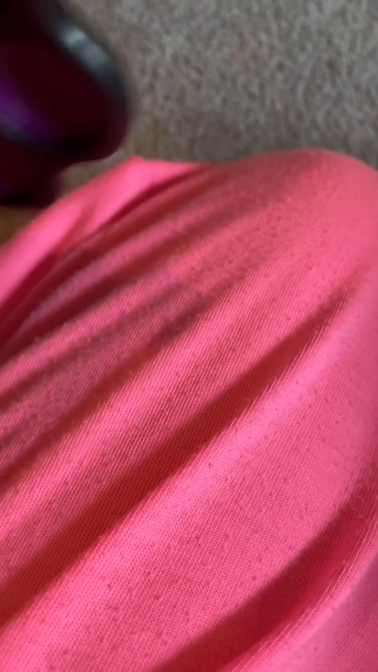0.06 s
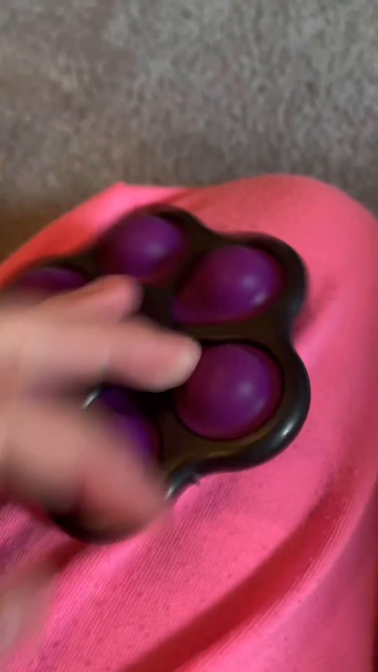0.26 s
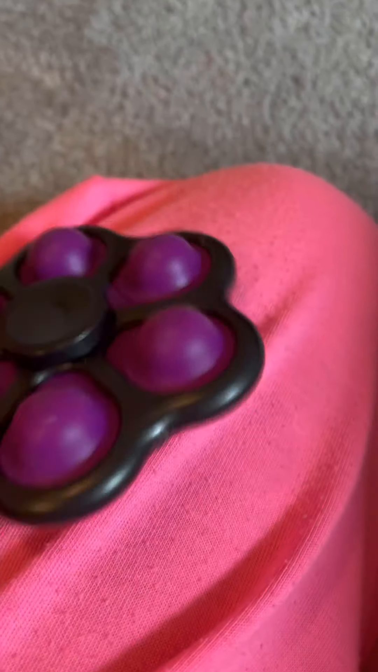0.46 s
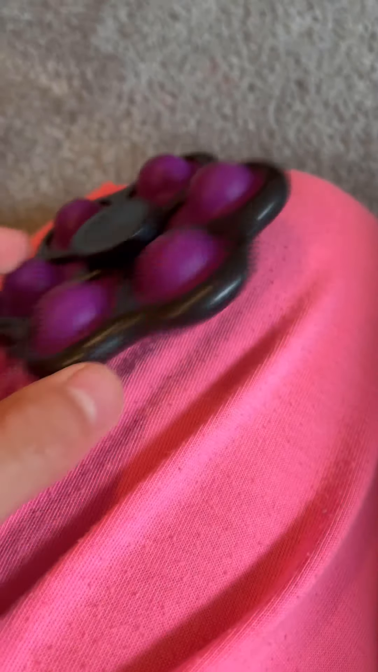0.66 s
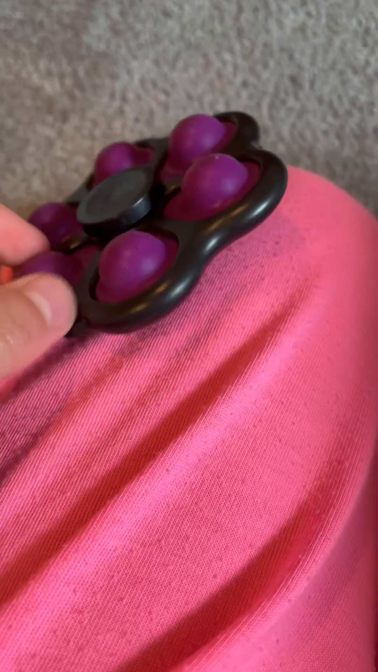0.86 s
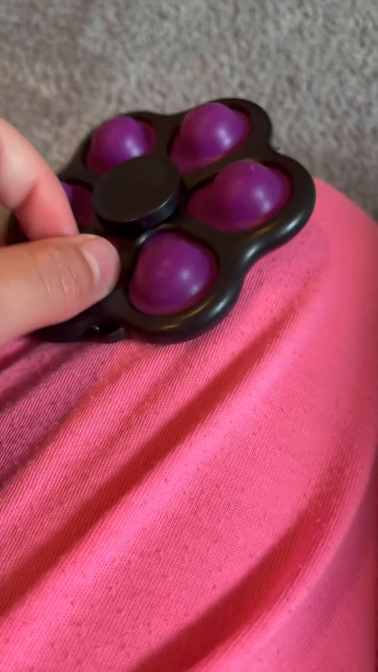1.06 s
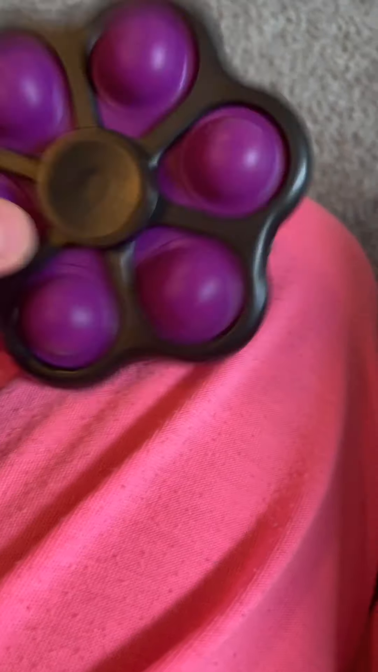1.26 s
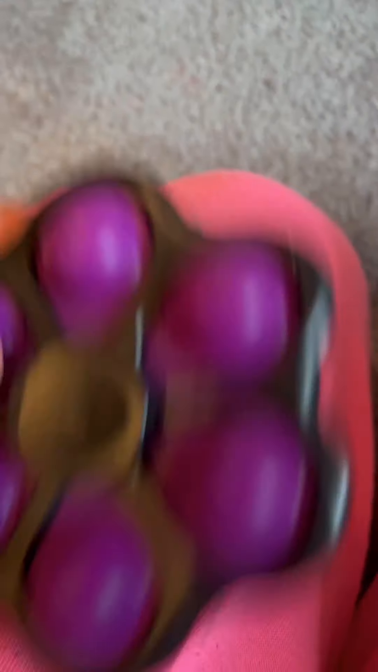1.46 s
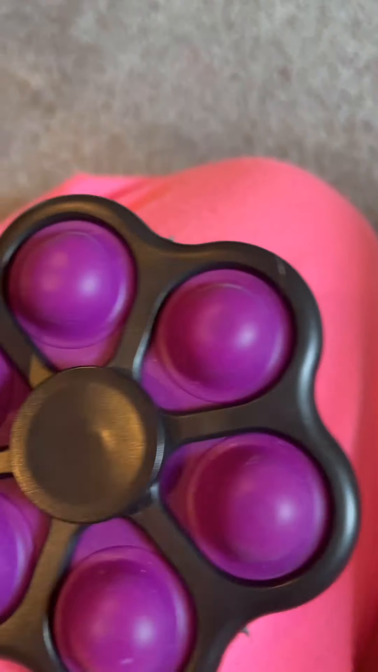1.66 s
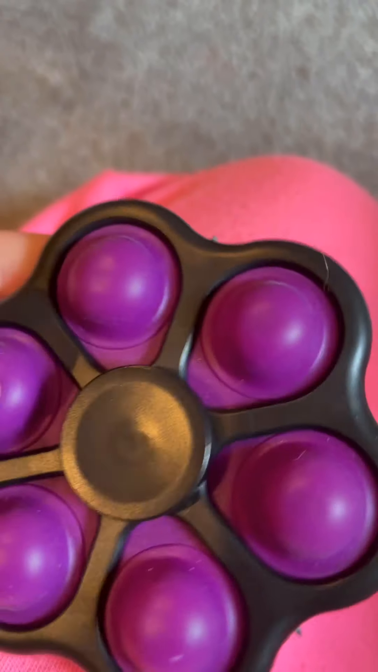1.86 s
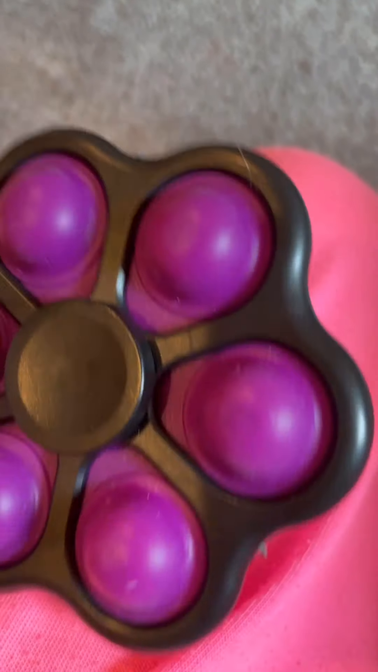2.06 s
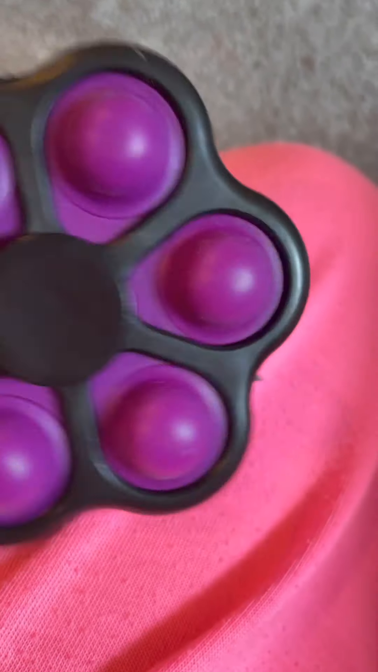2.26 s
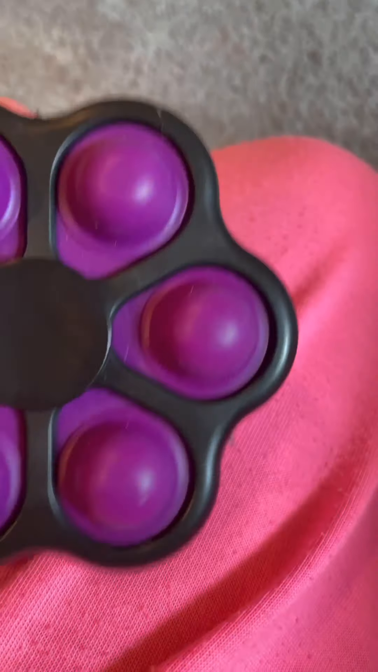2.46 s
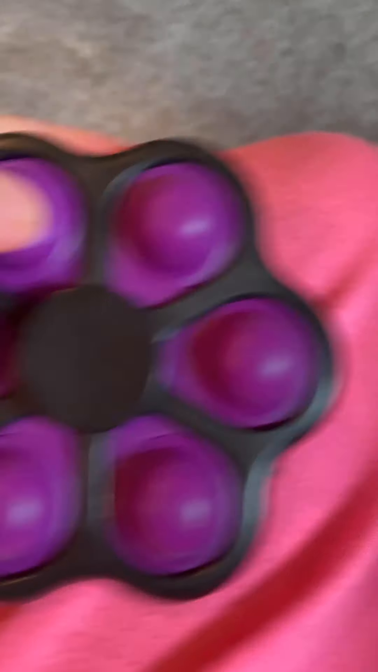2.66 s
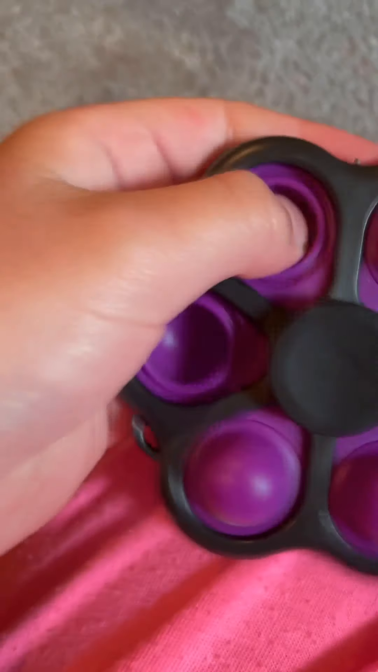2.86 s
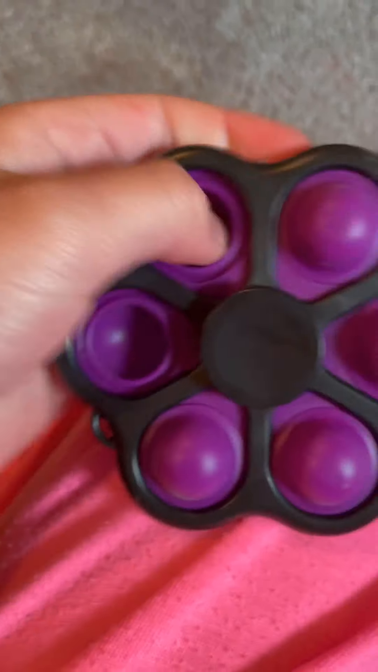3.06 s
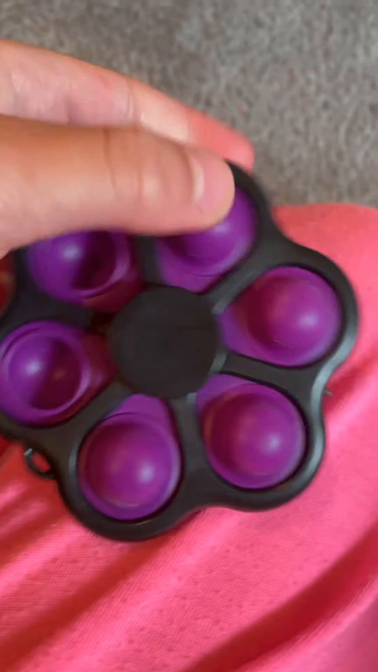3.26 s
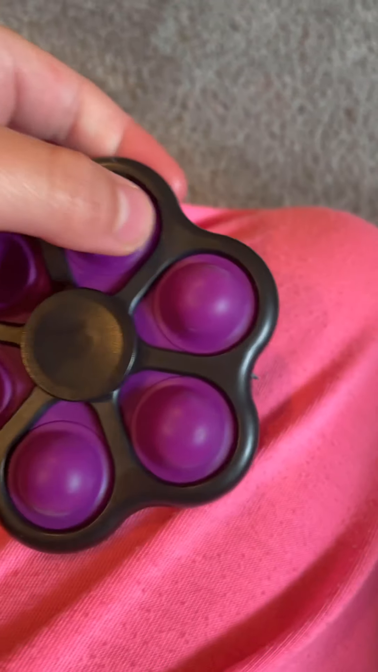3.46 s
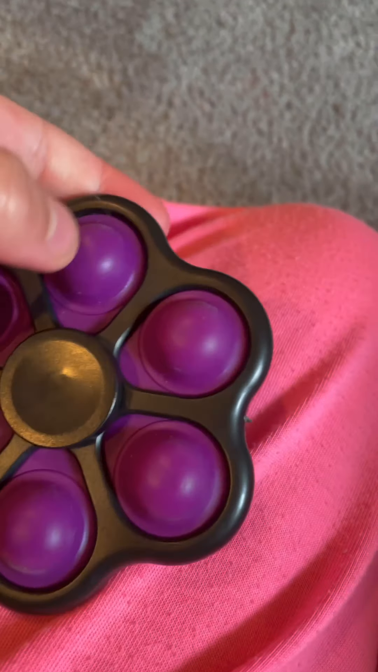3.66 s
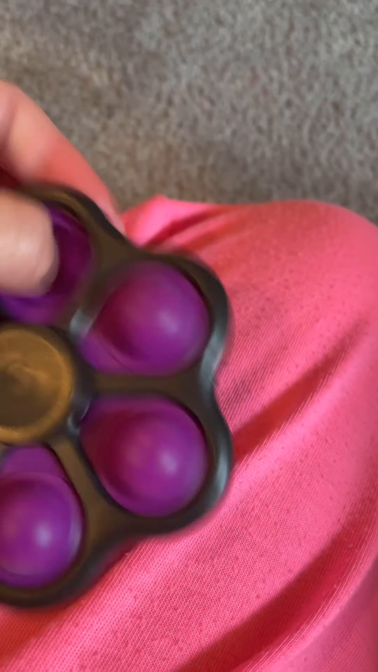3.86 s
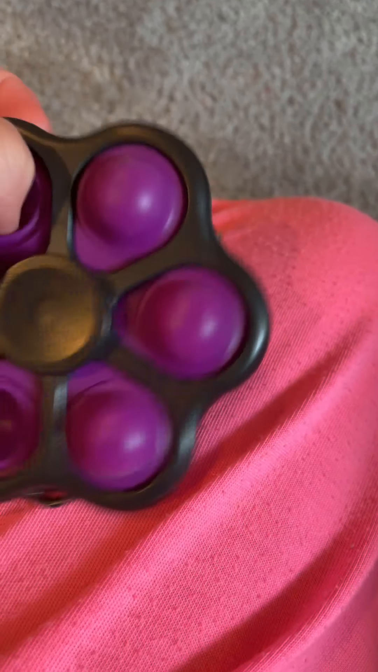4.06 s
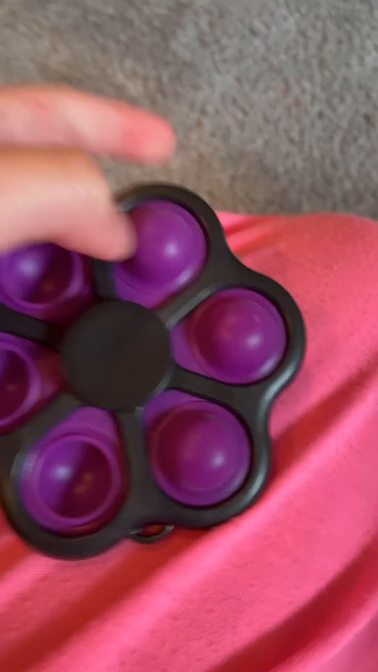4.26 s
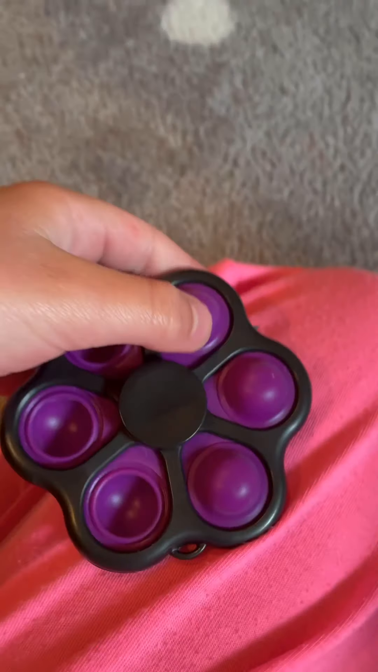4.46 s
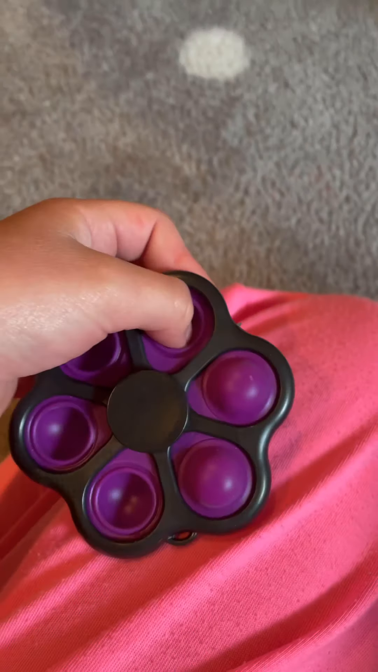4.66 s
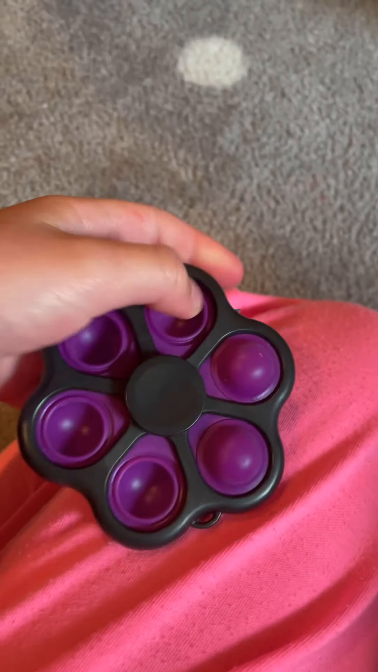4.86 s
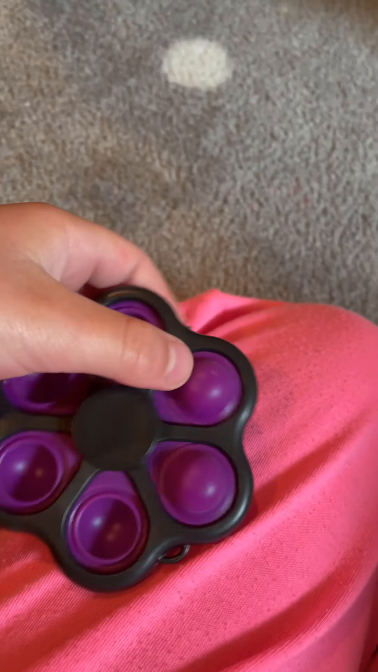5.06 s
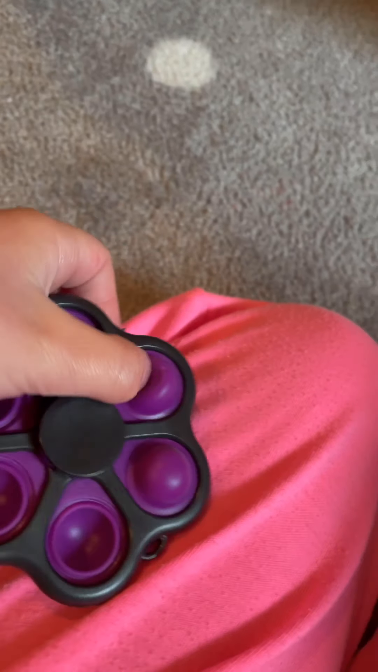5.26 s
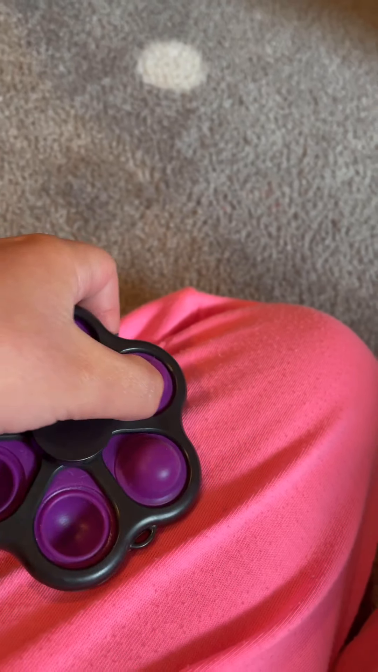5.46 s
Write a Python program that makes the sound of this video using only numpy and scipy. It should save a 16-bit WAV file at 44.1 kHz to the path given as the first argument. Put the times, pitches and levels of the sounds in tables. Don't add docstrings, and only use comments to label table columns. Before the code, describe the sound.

Close up in a quiet carpeted room, fingers tick, knock and rustle on a plastic-framed silicone bubble toy resting on a clothed lap. After two seconds a dome pops loudly, followed by three more pops about a second apart, the last faintest. Small clicks fill the gaps and a tiny creak comes before the third. Light touches end it over low, faint rumble, captured by a nearby stereo phone.

```python
import sys
import numpy as np
from scipy import signal
from scipy.fft import rfft, irfft, next_fast_len
from scipy.io import wavfile
from scipy.ndimage import map_coordinates

SR = 44100
rng = np.random.default_rng(int(sys.argv[2]) if len(sys.argv) > 2 else 0)


def boost_factor(decibels):
    exponent = np.asarray(decibels, float) / 20
    return 10 ** exponent


def wav_record(signal):
    frames = np.transpose(np.atleast_2d(signal))
    bounded = np.clip(frames, -1, 1)
    quanta = np.round(bounded * 32767).astype(np.int16)
    wavfile.write(sys.argv[1], SR, quanta)


N = 242991
SPAN = np.arange(-441, 1764) / SR


def unit(x):
    return x / np.sqrt(np.mean(x ** 2) + 1e-20)


def along(points, hz):
    f, v = np.transpose(points)
    return np.interp(np.log(hz + 1), np.log(f + 1), v)


def curves(rows):
    s, *cols = np.transpose(rows)
    return [np.interp(np.arange(N) / SR, s, c) for c in cols]


def wobble(rate):
    knots = rng.standard_normal(int(N * rate / SR) + 4)
    return map_coordinates(knots, [np.arange(N) * rate / SR])


def filtered(x, response):
    m = next_fast_len(x.shape[-1] + 4096)
    return irfft(rfft(x, m) * response(np.fft.rfftfreq(m, 1 / SR)), m)[..., :x.shape[-1]]


def coloured(x, spectrum):
    closed = [(spectrum[0][0] / 2, -120), *spectrum, (spectrum[-1][0] * 2, -120)]
    return unit(filtered(x, lambda hz: boost_factor(along(closed, hz))))


# (frequency [Hz], coherence [0 to 1])
PORT_COHERENCE = [(60, .9985), (140, 0.99), (300, 0.8), (600, 0.25), (1000, .55), (1500, .72), (2000, 0.89),
                  (3000, .9), (9000, .9), (15000, .75)]


def spread(pair):
    def turn(hz):
        return np.arccos(np.clip(along(PORT_COHERENCE, hz), -1, 1)) / 2
    same, apart = filtered(pair, lambda hz: np.array([np.cos(turn(hz)), np.sin(turn(hz))]))
    return np.array([same + apart, same - apart])


def hump(rise, fall, late=0, edge=0.66, hold=0):
    t = SPAN - late
    fade = np.exp(-(np.maximum(t - hold, 0) / fall) ** edge)
    return np.where(t < 0, np.exp(-(t / rise) ** 2), fade)


def add(track, s, piece):
    track[round(s * SR):][:len(piece)] += piece


def shifted(track):
    return track[-round(SPAN[0] * SR):][:N]


# (frequency [Hz], density [dB per Hz])
CRACK_SPECTRUM = [(700, -27.5), (1200, -16.5), (3000, -2), (4500, -0.5), (7000, -1.5), (9000, -5.5),
                  (12000, -13.5), (15500, -14.5), (16300, -23.5)]
# (time [s], peak [dB], crack [dB], swell [ms], fade [ms])
SNAPS = [
    (1.989, -6, -22, 1.23, 0.5),
    (2.8672, -10.5, -13, 0.92, 0.84),
    (3.8734, -8.5, -13.5, 0.6, 1.5),
    (4.633, -20.5, -10.5, 0.71, 0.76),
]
# (frequency [Hz], width [Hz], level [dB])
DOME_1_MODES = [(393, 290, -4.5), (880, 150, -26.5), (1480, 390, -20.5), (1800, 300, -19), (2490, 190, 4),
                (3620, 1300, -22.5), (6430, 1300, -29)]
DOME_2_MODES = [(456, 240, -1.5), (673, 200, -4.5), (899, 160, -9), (1477, 320, -6.5), (2000, 400, -8.5),
                (2310, 500, -8), (2690, 500, -7), (5200, 200, -23)]
DOME_3_MODES = [(470, 270, -5.5), (870, 170, -16.5), (1560, 80, -16.5), (1950, 350, -9.5), (2330, 620, -6),
                (3300, 330, -22), (3908, 270, -24), (5300, 840, -16.5)]
DOME_4_MODES = [(490, 210, -1.5), (845, 260, -4), (1403, 277.5, -9), (1780, 530, -6.5), (2310, 980, -6.5),
                (3000, 500, -13), (3650, 180, -15.5), (4470, 290, -41)]
AWAY_DB = (-5.5, 2, 5, 6.5)
AWAY_LOW_DB = (-1.5, 4, 0, 5)
HOLD_MS = (0.028, 0.18, 0.1, 2.6)


def dome_mode(hz, width, level_db, swell_ms, fade_ms, hold_ms, ring_db):
    late = 0.0029 / (1 + (hz / 900) ** 4)
    slow = hz < 1000
    if slow:
        push = hump(0.34 / width, 0.32 / width, late - 0.18 / hz, edge=1.5)
        envelope = push + boost_factor(ring_db) * hump(0.0015, 0.0028, late + 0.00052)
    else:
        envelope = hump(swell_ms / 1000, fade_ms * 0.39 / width, late, edge=0.99, hold=hold_ms * 1.6 / hz)
    wave = np.cos(2 * np.pi * (hz * (SPAN - late) + 0.5 * slow))
    return boost_factor(level_db) * width / 400 * wave * envelope


def off_axis_pop(dome, low_db, crack_db):
    def response(f):
        power = boost_factor(crack_db - 6.0 + along(CRACK_SPECTRUM, f)) ** 2
        for hz, width, level_db in dome:
            power = power + boost_factor(level_db + low_db * (hz < 600)) ** 2 / (1 + ((f - hz) / (0.7 * width)) ** 2)
        notch_db = -11.5 * np.exp(-((f - 1083.7) / 130) ** 2)
        return boost_factor(notch_db) * np.sqrt(power)
    return filtered(1.0 * (SPAN == 0), response)


def pops():
    near, far, uneven = np.zeros((3, N + SR))
    domes = (DOME_1_MODES, DOME_2_MODES, DOME_3_MODES, DOME_4_MODES)
    ring_on_db = (-23, -11.5, -15.5, -9.5)
    port_hiss_db = (-47, -61.5, -41, -35)
    lean = (-0.04, -0.14, -0.05, -0.075)
    each = zip(SNAPS, domes, AWAY_DB, AWAY_LOW_DB, HOLD_MS, ring_on_db, port_hiss_db, lean)
    for snap_row, dome, away_db, low_db, hold_ms, ring_db, hiss_db, share in each:
        s, db, crack_db, swell_ms, fade_ms = snap_row
        grit = rng.standard_normal((2, len(SPAN)))
        burst = hump(swell_ms / 1200, 0.0029, edge=1.9, hold=hold_ms / 3000)
        snap = boost_factor(crack_db) * coloured(grit[0], CRACK_SPECTRUM) * burst
        for hz, width, level_db in dome:
            snap = snap + dome_mode(hz, width, level_db, swell_ms, fade_ms, hold_ms, ring_db)
        slug = filtered(snap, lambda f: 1 / (1 + (f / 620) ** 8))
        hissing_air = unit(filtered(grit[1], lambda f: np.exp(-((f - 12350) / 1100) ** 2)))
        add(near, s, boost_factor(db) * snap)
        add(far, s, boost_factor(db + 26.0 + away_db) * off_axis_pop(dome, low_db, crack_db))
        add(uneven, s, boost_factor(db) * share * slug)
        add(uneven, s, boost_factor(db + hiss_db) * burst ** 1.7 * hissing_air)
    return shifted(near), shifted(far), shifted(uneven)


# (time [s], peak [dB], ring [Hz], crack [dB])
LIGHT_TAPS = [(0.23, -34, 3640, -6), (0.264, -57, 2480, -8), (0.3494, -52, 2990, -19),
              (0.396, -58.5, 2770, -29), (0.4459, -42, 3070, -11), (0.4768, -60, 3020, 1),
              (0.497, -45, 3320, -4.5), (0.5375, -38, 3000, -9), (0.5524, -38.5, 3000, -20),
              (0.576, -48, 2970, -23), (0.582, -55, 3004, -27), (1.2581, -50, 2780, 12),
              (1.3385, -58.5, 4300, 7), (1.5232, -42, 2750, -7), (1.6119, -50, 3150, -1.5),
              (1.62, -47, 2750, -4.5), (1.911, -52.5, 1377, -27), (2.3938, -45, 3220, -10.5),
              (3.0648, -56.5, 2282, 0), (3.103, -49.5, 2500, -8.5), (3.2606, -62.5, 2680, -13),
              (3.3443, -63.5, 2660, -7), (3.6987, -62.5, 1559, -29), (3.7671, -51, 2590, -11),
              (4.1788, -46, 5600, -0.5), (4.202, -50.5, 2530, -18), (4.5383, -43.5, 2690, -4.5),
              (4.551, -51, 2496, -3), (5.0747, -66, 2870, -25), (5.2822, -57.5, 2867, -2.5),
              (0.032, -46, 3970, -11), (0.1883, -54, 5200, 0), (0.241, -49, 5100, -6),
               (.4345, -57, 3080, -21), (0.47, -57, 2880, 0), (1.122, -54, 2340, -21),
               (1.132, -59, 2320, -3.5), (1.157, -72, 2300, 6), (1.197, -50, 4130, 3.5),
               (1.2564, -45.5, 6200, -11), (1.287, -42, 4400, -27), (1.4564, -58.5, 2590, -10),
               (1.501, -57, 4260, -17), (1.513, -55, 5200, -12), (1.59, -61, 2680, -2),
               (2.1612, -42.5, 5300, -4), (2.318, -66.5, 2680, -15), (2.3811, -60, 2500, -13),
               (2.466, -74.5, 4980, -5), (2.7205, -67.5, 4240, -1.5), (3.0089, -57, 4500, 0.5),
               (3.568, -56, 2750, -7), (4.14, -60.5, 2480, 2.5), (4.1502, -50, 1800, -13),
               (4.1947, -61, 5500, -6), (4.232, -53.5, 1700, -6), (4.817, -65, 8560, -5.5),
               (4.8543, -47.5, 1693, -23), (4.869, -66, 2470, -15)]
# (time [s], peak [dB], crack [dB], thud [Hz], thud [dB])
FINGER_KNOCKS = [(0.0339, -53, -4, 544, 8), (0.193, -67.5, -1, 785, 14.5), (0.2518, -39, 5, 694, -5.5),
                 (0.546, -48.5, -4, 590, -9), (0.607, -71.5, 6, 540, 17.5), (1.1959, -46.5, 3.5, 726, -2),
                 (1.254, -51, 10.5, 678, -0.5), (1.262, -53.5, -28.5, 520, 6.5),
                 (1.2821, -49.5, 11, 516, -15), (1.286, -48, 15.5, 563, -4), (1.316, -50.5, -36, 645, -2),
                 (1.341, -57.5, -8, 620, 8.5), (1.4328, -55.5, 9.5, 636, -7), (2.161, -49, 6.5, 683, -2),
                 (2.1682, -44.5, -3.5, 694, -6.5), (2.5325, -57.5, -6.5, 682, 3),
                 (2.9783, -51.5, 0, 563, 7.5), (3.0014, -59.5, 5, 681, -8), (3.7776, -40, -3, 710, -11.5),
                 (4.15, -47, -4, 625, -4.5), (4.1658, -50, -18, 538, -5.5), (4.2407, -41, -5, 679, -11.5),
                 (4.8551, -51.5, 5, 686, -1.5), (5.2111, -81, -9.5, 729.5, 25.5),
                 (2.683, -92, -13, 749, 24), (4.1795, -77.5, -8, 656, 24), (1.467, -70, 2, 835, 9)]
# (time [s], peak [dB], crack [dB], thud [dB], thud [Hz])
SKIN_GIVES = [(1.959, -41, -5, 18, 480), (1.9711, -54, 3.5, -11.5, 440.7), (1.98, -27, -25.5, -16.5, 439.2),
              (2.7878, -33, -2.5, 4.5, 420), (2.8575, -46.5, -14, -15.5, 437.5),
              (3.8535, -24.5, -7, 4, 442.2), (3.8614, -39, -2.5, -4.5, 441),
              (3.8639, -45.5, -9.5, -8.5, 440), (3.8688, -28.5, -17, -17, 442.6),
              (4.5854, -37, 4, 4.5, 428.7), (4.61, -45.5, 2, -12.5, 441.4), (4.625, -40, -10.5, -15.5, 440)]


def contact(db, ring_hz, crack_db, thud_hz, thud_db, thud_shape):
    late, rise, fall = thud_shape
    grit = rng.standard_normal((2, len(SPAN)))
    rough = unit(filtered(grit[0], lambda hz: 1 / (1 + ((hz - ring_hz) / 600) ** 2)))
    pure = np.sqrt(2) * np.sin(2 * np.pi * ring_hz * SPAN)
    ring = (0.58 * rough + 0.42 * pure) * hump(0.0006, 0.0016, late=0.00055)
    crack = boost_factor(crack_db) * coloured(grit[1], CRACK_SPECTRUM) * hump(0.0005, 0.0012, late=0.0008)
    push = np.cos(2 * np.pi * thud_hz * (SPAN - late)) * hump(rise, fall, late=late, edge=1.2)
    return boost_factor(db - 5.5) * (ring + crack + boost_factor(thud_db + 1.5) * push)


def ticks():
    track = np.zeros(N + SR)
    frame, skin = (0.002, 0.0011, 0.0026), (0.0025, 0.00081, 0.0013)
    frame_hz, skin_hz = 2750, 2560
    for s, db, ring_hz, crack_db in LIGHT_TAPS:
        add(track, s, contact(db, ring_hz, crack_db, 415, -20, frame))
    for s, db, crack_db, thud_hz, thud_db in FINGER_KNOCKS:
        add(track, s, contact(db, frame_hz, crack_db, thud_hz, thud_db, frame))
    for s, db, crack_db, thud_db, thud_hz in SKIN_GIVES:
        add(track, s, contact(db, skin_hz, crack_db, thud_hz, thud_db, skin))
    return shifted(track)


# (time [s], peak [dB], frequency [Hz], ring [ms])
PINGS = [(0.478, -51, 2850, 2), (0.485, -57, 2750, 3), (0.4902, -57, 2750, 2), (.4962, -53, 2880, 2),
         (0.502, -60, 2950, 1.5), (0.5456, -46, 2470, 1.3), (.558, -57, 2680, 2), (.567, -62, 2800, 2),
         (.5755, -59, 2900, 1.5), (.5875, -61, 3000, 1.3), (1.202, -61, 4004, 6), (1.232, -68, 3530, 2),
         (1.289, -49.5, 4200, 6.3), (1.293, -52, 3120, 1.7), (1.302, -81, 4080, 5),
         (1.3435, -66, 3000, 1.5), (1.438, -57, 2600, 1.4), (1.503, -59, 2620, 1.3),
         (1.619, -54, 2680, 1.6), (1.64, -58, 2800, 2), (1.661, -64, 2540, 2.7),
         (2.17, -53.5, 2700, 1.44), (3.001, -60, 4300, 1.5), (3.009, -65, 2390, 2),
         (3.888, -45.5, 2210, 1.5), (3.885, -50, 5970, 1.97), (4.037, -63.5, 2300, 3),
         (2.882, -45.5, 2300, 1.7), (2.803, -58, 2200, 2), (2.003, -44.5, 2551, 2),
         (4.647, -45, 2000, 2.4), (4.5385, -56.5, 3503, 1.3), (5.245, -72, 2290, 1.5),
         (5.246, -68, 3300, 1.34), (5.252, -64.5, 1870, 1.7), (5.286, -68, 1880, 1.8),
         (3.779, -52, 1550, 1.8), (4.242, -55, 1800, 1.44), (2.112, -62, 2550, 4),
         (2.125, -62, 2500, 3), (.231, -46, 5600, 1.5)]
# (time [s], peak [dB], frequency [Hz], ring [ms])
KNUCKLE_BUMPS = [(1.439, -61.5, 620, 2), (1.516, -60, 670, 1.9), (1.526, -56, 580, 2.2),
                 (1.614, -63, 610, 1.5), (2.177, -54.5, 660, 2), (2.19, -64, 740, 3.4),
                 (2.396, -63.5, 682, 2.4), (3.01, -56.5, 673, 2.5), (3.107, -63, 680, 2)]


def rattle():
    track = np.zeros(N + SR)
    for s, db, hz, ring_ms in PINGS + KNUCKLE_BUMPS:
        envelope = hump(0.74 / hz, ring_ms / 1000, edge=2.3)
        add(track, s, boost_factor(db) * np.sin(2 * np.pi * hz * SPAN) * envelope)
    return shifted(track)


# (frequency [Hz], density [dB per Hz])
STROKE_FIZZ_SPECTRUM = [(700, -7.5), (1200, -17), (3500, 4), (5000, 2.5), (8000, 1.5), (10000, -3.5),
                        (13000, -4.5), (16000, -3.5)]
# (time [s], half length [s], body [dB], body [Hz], fizz [dB])
SKIN_STROKES = [(0.201, 0.021, -70.5, 4900, 6), (0.25, 0.011, -66, 2900, -8), (0.3, 0.015, -63, 2790, -8),
                (0.488, 0.023, -67, 2880, -6.5), (0.56, 0.028, -75.5, 2750, -1),
                (0.237, 0.12, -89.5, 2600, 15.5), (0.66, 0.11, -100.5, 2800, 18),
                (1.392, 0.031, -79, 8700, -12), (2.68, 0.063, -97.5, 2400, 10.5),
                (4.394, 0.029, -89, 7260, -11), (0.977, .053, -97.5, 2780, 18),
                (1.118, 0.029, -71.5, 2370, -8), (1.275, 0.012, -71.5, 2600, -28),
                (1.29, .0092, -85, 4000, -20), (1.461, 0.018, -69, 2670, -3.5), (1.46, 0.021, -78, 2800, 2),
                (1.63, 0.042, -71, 2700, -7.5), (1.87, 0.011, -76.5, 2500, -5),
                (2.168, 0.052, -77, 2565, 1.5), (2.31, 0.018, -87, 3600, 2.5),
                (2.44, .013, -67.5, 2430, -4), (2.453, 0.016, -62.5, 8050, -7.5),
                (3.03, 0.016, -68.5, 2520, -3.5), (3.279, 0.034, -79.5, 8100, -9),
                (3.59, 0.019, -67.5, 2750, -3), (4.178, 0.034, -76, 2366, -18),
                (4.606, 0.021, -62.5, 2200, -23), (4.836, 0.012, -73.5, 2025, -5),
                (4.934, 0.031, -71, 2650, -4), (5.248, 0.0094, -75, 2430, -8.5),
                (3.29, 0.046, -88, 2780, -17), (.168, 0.026, -86, 3700, 3),
                (4.102, 0.012, -73.5, 2330, -6.5), (3.59, 0.031, -78.5, 1560, -12),
                (3.585, .022, -76, 5400, -10), (1.79, 0.037, -86.5, 1300, -23),
                (3.11, .03, -83.5, 1400, -15), (3.795, 0.013, -82.5, 2600, -10),
                (2.14, .03, -82.5, 1400, -14)]


def strokes():
    track = np.zeros(N + SR)
    catches = boost_factor(4.5 * wobble(220))
    t = np.arange(-SR // 6, SR // 6) / SR
    for s, half, db, body_hz, fizz_db in SKIN_STROKES:
        grip = catches[round(s * SR) - len(t) // 2:][:len(t)]
        grit = rng.standard_normal((2, len(t))) * grip ** [[1], [0.4]]
        width = 300 + 0.049 * body_hz
        body = unit(filtered(grit[0], lambda hz: 1 / (1 + ((hz - body_hz) / width) ** 2)))
        fizz = boost_factor(fizz_db) * coloured(grit[1], STROKE_FIZZ_SPECTRUM)
        add(track, s + t[0], boost_factor(db) * np.exp(-(t / half) ** 4) * (body + fizz))
    return track[:N]


# (time [s], slip rate [Hz], level [dB])
SLIPS = [
    (3.54, 170, -90),
    (3.59, 168, -78),
    (3.65, 168, -81),
    (3.7, 170, -94),
]


def creak():
    rate, db = curves(SLIPS)
    phase = 2 * np.pi * np.cumsum(rate * (1 + 0.012 * wobble(40))) / SR
    start, end = SLIPS[0][0], SLIPS[-1][0]
    inside = np.abs(np.arange(N) / SR - (start + end) / 2) < (end - start) / 2
    level = inside * boost_factor(db + 1.9 * wobble(43))
    return level * sum(boost_factor(part_db) * np.sin(k * phase) for k, part_db in ((3, -3), (4, 0.1), (5, -4)))


# (time [s], sliding [dB], weight on the lap [dB])
HAND_MOTION = [(0.0, -82.5, -70.5), (.25, -81, -68), (.4, -88, -74), (.56, -79.5, -66.5), (.95, -92, -73),
               (1.3, -79.5, -69.5), (1.55, -77.5, -70.5), (1.8, -88, -70.5), (2.15, -79, -73.5),
               (2.5, -88, -70.5), (2.9, -85, -70.5), (3.2, -89.5, -77), (3.6, -90.5, -74.5),
               (4.15, -79.5, -77), (4.35, -93.5, -78.5), (4.7, -87.5, -75.5), (5.0, -93, -84.5),
               (5.51, -95, -80.5)]
# (frequency [Hz], density [dB per Hz])
BODY_SPECTRUM = [(1000, -14.5), (1600, -3.5), (2100, -10), (2600, 0), (3200, -6.5), (4200, -11.5),
                 (5500, -30.5)]
FIZZ_SPECTRUM = [(3000, -18.5), (4200, -2), (6000, 1.5), (8000, 4.5), (10000, -0.5), (13000, -0.5),
                 (15500, -3.5), (16500, -13.5)]
DRAG_SPECTRUM = [(200, -14.5), (400, 4.5), (650, -1.5), (900, -14.5), (1300, -19)]
GRIP_SPECTRUM = [(110, -16), (150, -1), (220, 0.5), (320, -2.5), (420, -16.5)]


def rustle():
    clumps, out = wobble(63), 0
    sliding, weight = curves(HAND_MOTION)
    layers = [(sliding, -3.5, 0.67, BODY_SPECTRUM), (sliding, -2.5, 1, FIZZ_SPECTRUM),
              (sliding, 5, 1, DRAG_SPECTRUM), (weight, -1, 0.94, GRIP_SPECTRUM)]
    for drive_db, over_db, grows, spectrum in layers:
        grain = boost_factor(clumps + wobble(150) + 3.1 * wobble(12.0)) * rng.standard_normal((2, N))
        usual_db = drive_db.mean()
        level = boost_factor(usual_db + over_db + grows * (drive_db - usual_db))
        out = out + level * coloured(spread(grain), spectrum)
    return out


# (frequency [Hz], t60 [s])
ROOM_T60 = [(200, 0.2), (500, 0.21), (1000, .26), (1500, 0.3), (2300, 0.38), (3500, 0.32), (5000, .29),
            (7500, 0.24), (12000, .12)]
# (frequency [Hz], level [dB])
TAIL_COLOUR = [(150, -7.5), (300, 1.5), (480, 13.5), (700, 5.5), (1100, -11.5), (1600, -5.5), (2500, -3),
               (3600, 1), (6500, -1.5), (9000, -14.5), (10500, -40), (16000, -48)]
# (delay [s], strength [ratio])
FIRST_ECHOES = [(.0105, .6), (.0135, 2.9), (.0155, 1.2), (.021, .8), (.029, .8)]


def room(x):
    out, hop = np.zeros((2, N + SR)), SR // 3
    for start in range(0, N, hop):
        hz, t, z = signal.stft(rng.standard_normal((2, SR // 2)), SR, nperseg=256)
        decay_db = along(TAIL_COLOUR, hz)[:, None] - 60 * t / along(ROOM_T60, hz)[:, None]
        tail = signal.istft(z * boost_factor(decay_db), SR, nperseg=256)[1]
        age = np.arange(tail.shape[1]) / SR
        onset = 0.6 * (age > 0.003) + 0.72 * np.clip(age / 0.027, 0, 1)
        for delay, strength in FIRST_ECHOES:
            onset = onset + strength * np.exp(-((age - delay) / 0.00082) ** 2)
        tail = spread(tail * onset)
        wet = signal.fftconvolve(x[None, start:start + hop], tail / np.linalg.norm(tail[0]), axes=1)
        out[:, start:start + wet.shape[1]] += wet
    return out[:, :N]


# (frequency [Hz], density [dB per Hz])
RUMBLE_SPECTRUM = [(12, -42), (25, -19.5), (43, -9), (60, -4), (85, -1), (100, -8.5), (135, -17),
                   (250, -28.5), (450, -44.5), (750, -46), (1100, -50)]
# (frequency [Hz], density [dB per Hz])
HISS_SPECTRUM = [(500, -24.5), (1200, 4), (2600, -7), (4000, -7.5), (8000, -5), (12000, -5), (14000, -13.5),
                 (16500, -17.5)]


def background():
    wander = boost_factor(wobble(3))
    rumble = wander * boost_factor(-60.0) * coloured(spread(rng.standard_normal((2, N))), RUMBLE_SPECTRUM)
    return rumble + boost_factor(-92.5) * coloured(spread(rng.standard_normal((2, N))), HISS_SPECTRUM)


def treble_difference(x):
    def response(hz):
        return boost_factor(-13) * np.exp(-2j * np.pi * hz * 0.00027) / (1 + (24000 / (hz + 1)) ** 8)
    return filtered(x, response)


def scene():
    domes, off_axis, uneven = pops()
    clicks, rubs = ticks() + rattle(), strokes()
    differs = treble_difference(domes + clicks) + uneven
    near = domes + clicks + rubs + creak() + differs * [[1], [-1]]
    wet = boost_factor(-26.0) * room(off_axis + boost_factor(4.0) * (clicks + rubs))
    return near + wet + rustle() + background()


def roll_off(x):
    return signal.sosfilt(signal.butter(12, 17160, fs=SR, output="sos"), x)


# (frequency [Hz], delay [ms])
BASS_DELAY = [(60, 8), (120, 6), (200, 3.2), (330, 1), (500, 0)]
# (frequency [Hz], phase [rad])
PORT_LEAD = [(100, .06), (300, .15), (550, .3), (850, .14), (1200, .07), (1700, .2), (2600, .9), (4900, .7),
             (6500, 1.6), (10000, 2.6), (11300, 3.1), (13200, 3.5), (15000, 4.5)]


def record(dry):
    top_hz = 15850

    def response(hz):
        lag = along(BASS_DELAY, hz) / 1000
        bass_phase = 2 * np.pi * hz[1] * np.cumsum(lag[::-1])[::-1]
        port_phase = 0.5 * along(PORT_LEAD, hz) * np.array([[1], [-1]])
        cut_db = np.interp(hz, [top_hz, top_hz + 150, top_hz + 900], [0, -11, -30])
        return boost_factor(cut_db) * np.exp(1j * (bass_phase + port_phase))
    ports = filtered(dry, response)
    return roll_off(ports)


dry = scene()
out = record(dry)
wav_record(out)
```